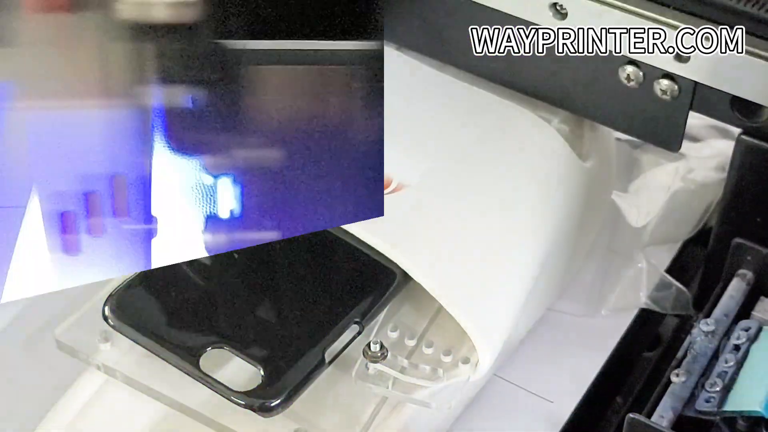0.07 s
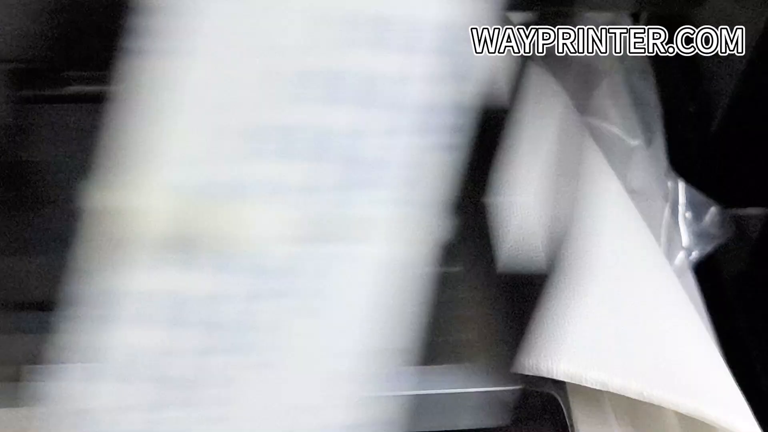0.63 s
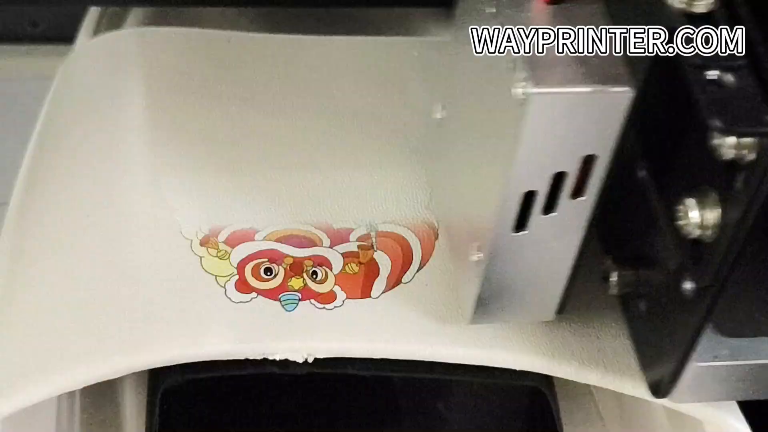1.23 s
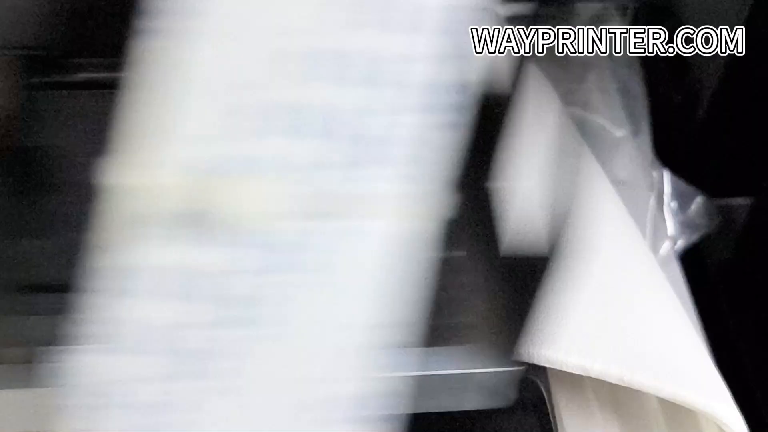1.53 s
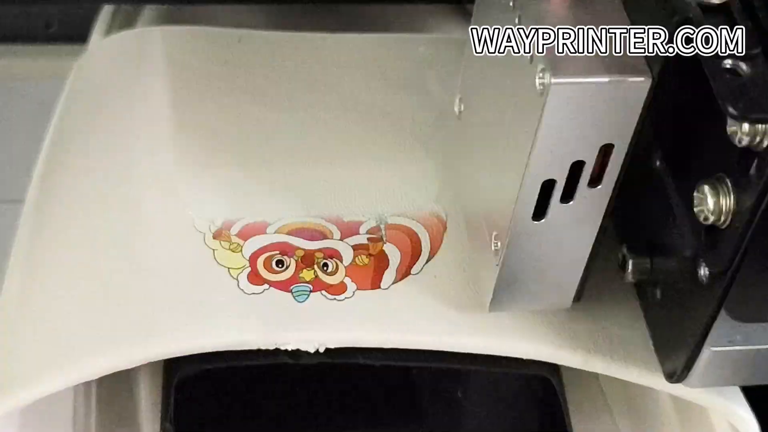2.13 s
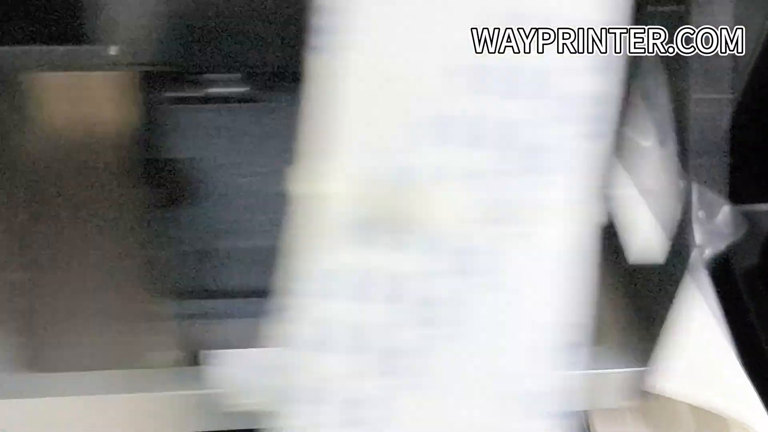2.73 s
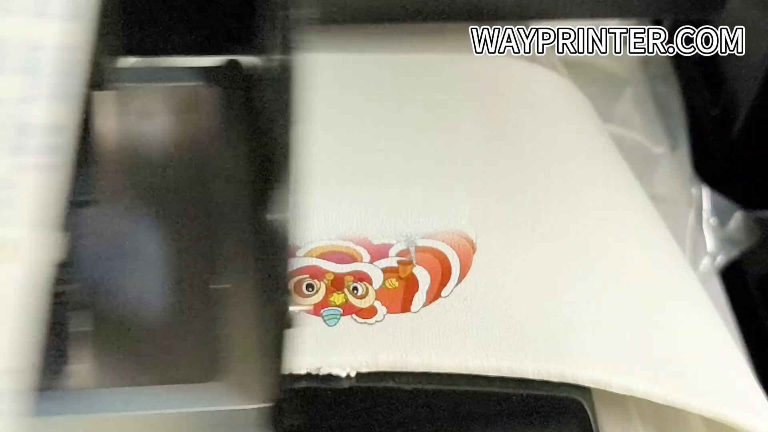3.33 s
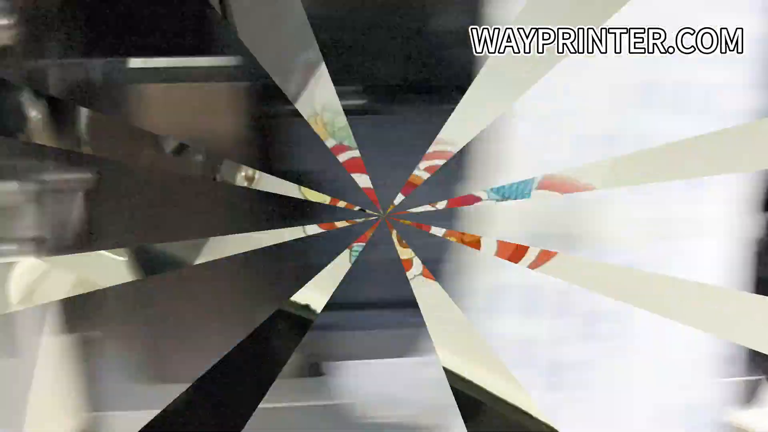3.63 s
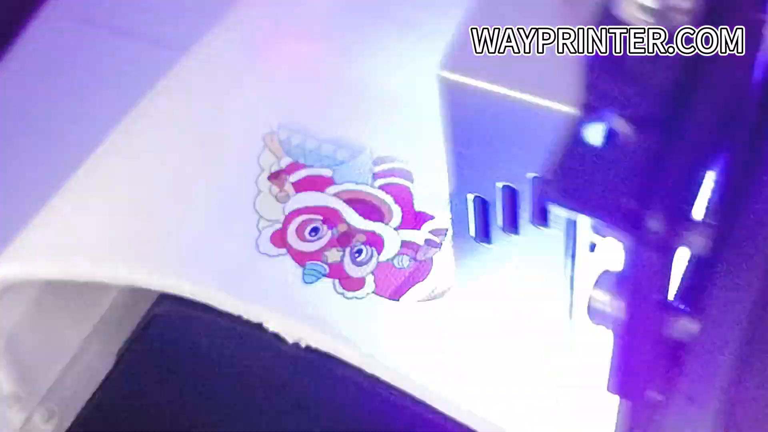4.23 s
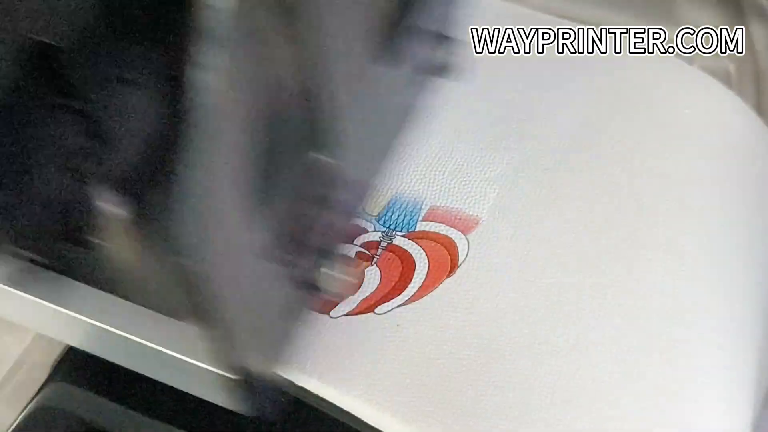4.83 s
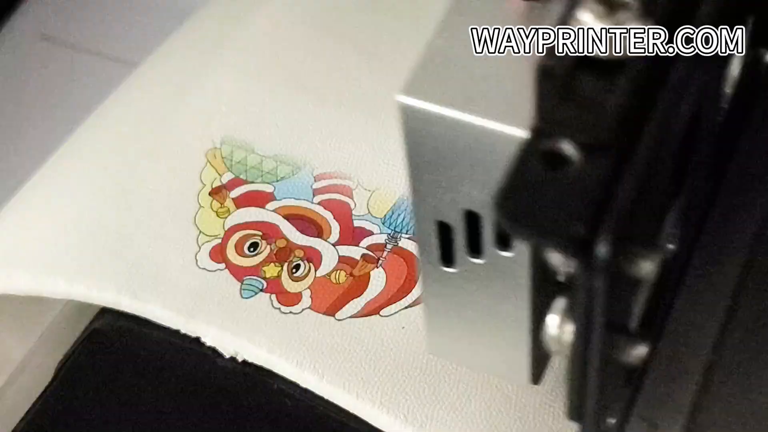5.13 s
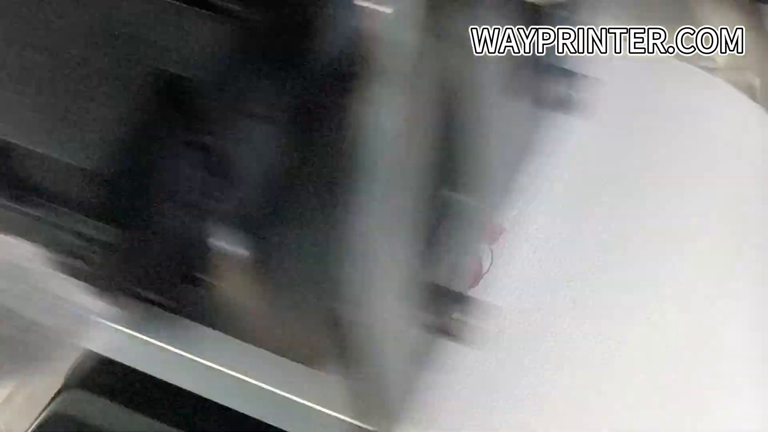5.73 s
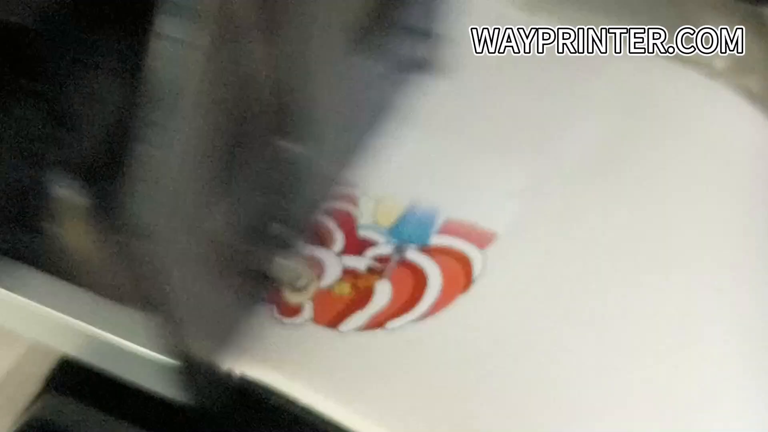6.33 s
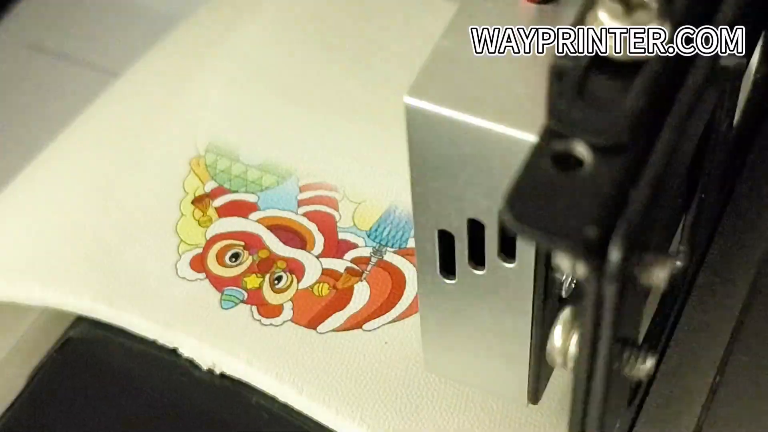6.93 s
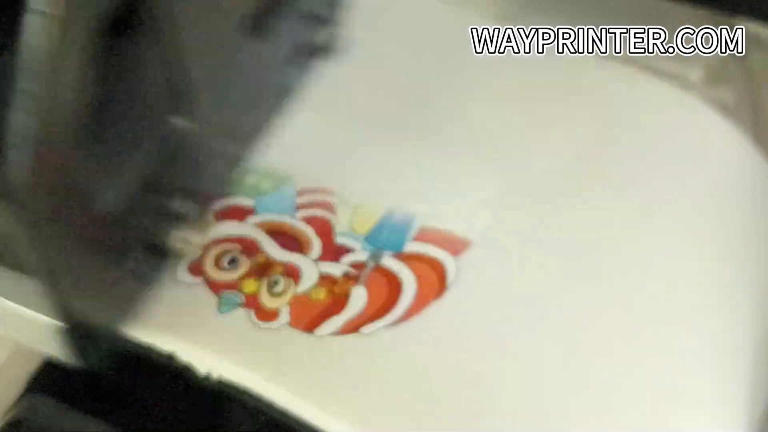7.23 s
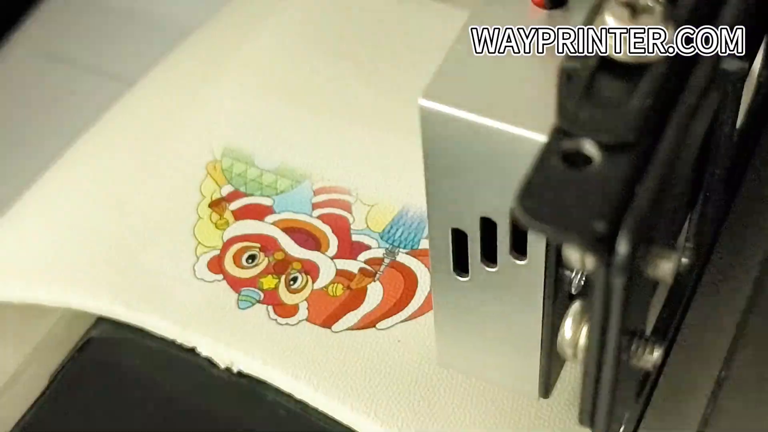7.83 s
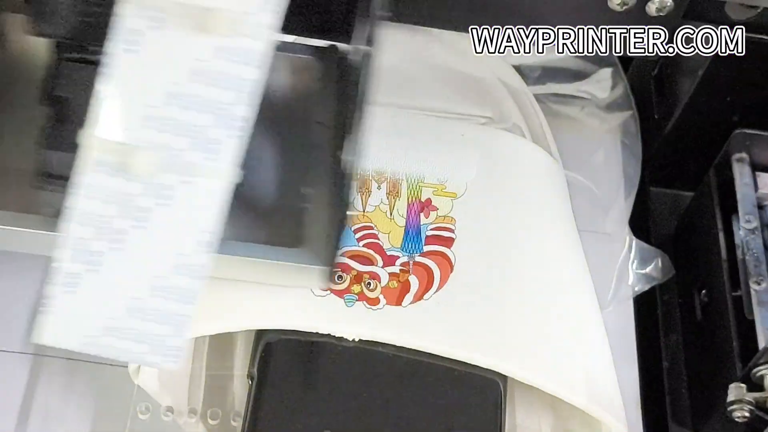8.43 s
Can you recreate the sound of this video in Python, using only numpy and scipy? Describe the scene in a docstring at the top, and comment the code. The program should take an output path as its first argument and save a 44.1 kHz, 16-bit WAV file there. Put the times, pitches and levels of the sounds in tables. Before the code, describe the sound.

Motors and fans hum steadily while a printer's carriage shuttles to and fro, each fast, squeaky swish followed by a slower one. Sharp belt clicks mark the starts, light ticks fall in between, and the frame drones with each stroke. The microphone is close, first in front, then at the side, where a vent hisses and the squeals stand out more, then in front again. Very short silences separate these stretches.

```python
"""A swish dashes past and returns more slowly, over and over, with squeals, ticks and a low drone.
It is a flatbed printer, heard close up from the front or side, in four stretches with silence between.
Ball bearings swish and squeal as the carriage that holds the print head runs along its rail.
The drive belt snaps tight and shakes the frame, a cable chain ticks, and motors and fans hum on."""
import sys
import numpy as np
from scipy import signal
from scipy.fft import rfft, irfft
from scipy.io import wavfile
from scipy.ndimage import uniform_filter1d

SR = 44100
rng = np.random.default_rng(int(sys.argv[2]) if len(sys.argv) > 2 else 0)


def to_wav(s):
    """Save 16-bit WAV."""
    ch = np.atleast_2d(s).T  # columns
    pcm = np.round(np.clip(ch, -1, 1) * 32767)  # PCM
    wavfile.write(sys.argv[1], SR, pcm.astype(np.int16))


N = 373527
CYCLE_S, TURN_S = 0.87, 0.3486  # one round trip; the moment the carriage turns at the far end

# The tone of the swish from the front and from the side:
# (frequency [Hz], fast stroke level [dB], slow stroke level [dB], left minus right [dB])
FRONT_SWISH = [(550.0, -38, -37.5, 0), (1150, -42.5, -42.5, 3), (1940, -37.5, -38, -3),
               (2650, -39, -37.5, 2), (3920, -41.5, -42.5, 1), (5000.0, -41.5, -41.5, 1.5),
               (5900, -44.5, -43, -5), (7300.0, -46, -46.5, -10), (7870, -48, -49.5, -2),
               (8400, -40.5, -42.5, 13), (10060, -45.5, -44, 7.5), (13400, -49, -49, 5),
               (15000.0, -47, -49.5, -0.5)]
SIDE_SWISH = [(550.0, -43.5, -37.5, 0), (1100.0, -40.5, -41, 0.5), (1850, -44, -43.5, 0.5),
              (2610, -36.5, -37.0, 1), (3920, -42, -43, 2), (5040, -42, -41, 1.5),
              (5900, -41.0, -40.0, -6.0), (7230, -41.5, -42, -19.5), (8100, -44, -42.5, -0.5),
              (8440, -41.0, -39.5, 1.5), (9800, -46.0, -45.5, 7), (13000.0, -45, -45.5, -1.5),
              (14900, -46, -47, -8.5)]
# Dry spots on the rail that squeal on the fast stroke: (time into the trip [s], half length [s], level [dB])
DRY_SPOTS = [(0.081, 0.0083, -45.5), (0.132, 0.016, -36), (0.183, .006, -37), (0.21, 0.0099, -35)]
# The carriage leaves home, its starting end, and the belt snaps tight: (time [s], click level [dB])
LAUNCHES = [(0.556, -35), (1.431, -31.5), (2.288, -35), (3.167, -33), (4.444, -29), (5.318, -32),
            (6.194, -35.5), (7.067, -26), (7.947, -30)]


def bearings(trip_s, place, swish_db, grain_db=0.68, flutter_db=0.89, rasp_db=2.0):
    """Rolling balls make the rail ring; they jostle, so the swish is grainy, most of all in the treble."""
    swish = np.zeros((2, N))
    no_bass = 1 / (1 + (480 / (frequencies() + 1)) ** 6)
    for where, (colour, level_db) in enumerate([(FRONT_SWISH, 0), (SIDE_SWISH, 2.1)]):
        for column, stroke in [(1, trip_s < TURN_S), (2, trip_s >= TURN_S)]:
            gain = rail_colour(colour, where, column) * reflections(depth_db=3.5, spacing_hz=59.66) * no_bass
            swish += amp(level_db) * noise(gain, curve(colour, column=3)) * stroke * (place == where)
    treble = irfft(rfft(swish) / (1 + (7000 / (frequencies() + 1)) ** 4), N)
    treble_db = rasp_db * wobble(rate_hz=130) + 0.034 * (swish_db + 28)  # harder running is brighter
    swish += treble * (amp(treble_db) - 1)
    return swish * amp(swish_db + grain_db * wobble(rate_hz=400) + flutter_db * wobble(rate_hz=80))


def carriage_speed(trip_s, ease_s):
    """Each stroke speeds up, cruises and brakes; the drive rounds off every change of speed."""
    # The dash out and the slower return:
    # (start in the trip [s], speeding up [s], cruising [s], braking [s], top speed [share of full speed])
    strokes = [(0, 0.066, 0.13, 0.11, 0.97), (0.381, 0.11, 0.17, 0.12, 0.66)]
    ramps = sum(np.interp(trip_s, np.cumsum(times), [0, top, top, 0]) for *times, top in strokes)
    return np.maximum(uniform_filter1d(ramps, round(ease_s * SR)), 0)


def swish_level(trip_s, speed, place, run_db=-27, rest_db=-55.5, dry_rub_db=1.5):
    """The bearings get louder with speed, and a little more on each dry spot (dB)."""
    dryness = sum(bump(trip_s, at, half) for at, half, _ in DRY_SPOTS)
    steepness = np.where(place, 1, 1.18)  # speed matters less at the side
    rolling = amp(run_db + dry_rub_db * dryness) * speed ** steepness
    return 20 * np.log10(np.hypot(rolling, amp(rest_db)))


def rail_colour(colour, where, column):
    """The tone of one stroke at one listening place, lifted or dipped where the rail rings."""
    # Notes at which rail and carriage ring: (pitch [Hz], width [Hz], front lift [dB], side lift [dB])
    rail_notes = [(743.7, 43, 12, 12.5), (867, 47, -5.5, 8), (1316, 87, 4, 3), (1675, 76, 0.5, 6.5),
                  (1890, 243, 6.5, 12.5), (2430, 160, 1.5, 2), (3010, 55, 1.5, 4), (5860, 200, 5.5, 4),
                  (6590, 220, 3.5, 6), (7370, 230, 4, 9), (8450, 560, 5.5, 4)]
    lift_db = sum(lifts[where] * resonance(hz, width) for hz, width, *lifts in rail_notes)
    return amp(curve(colour, column) + lift_db)


def wall_echo(swish, trip_s, strength=0.23, near_s=0.0032, travel_s=0.00111):
    """The end wall throws the swish back; the delay changes as the carriage travels, so the tone shifts."""
    half_turns = np.interp(trip_s, [0, TURN_S, CYCLE_S], [0, 1, 2])
    position = (1 - np.cos(np.pi * half_turns)) / 2
    delay_s = near_s + travel_s * position
    samples = np.arange(N)
    echo = np.array([np.interp(samples - SR * delay_s, samples, ear) for ear in swish])
    return (swish + strength * echo) / np.sqrt(1 + strength ** 2)


def squeal(trip_s, place, swish_db, squeal_hz=3997, whistle_hz=14075, side_db=4.5):
    """On the fast stroke the bearings sing, flaring on each dry spot; a thin whistle rides along."""
    flares = sum(amp(db) * bump(trip_s, at, half) for at, half, db in DRY_SPOTS)
    singing = amp(-49.5 + 2.1 * (swish_db + 26)) * (trip_s < TURN_S)  # grows faster than the swish
    turns = np.cumsum(squeal_hz + 20 * wobble(rate_hz=56)) / SR
    ear_phase = np.array([[0], [0.8]])
    tone = np.sqrt(2) * np.sin(2 * np.pi * turns + ear_phase) * amp(-3.5 + 4.2 * wobble(rate_hz=80))
    whistle = noise(resonance(whistle_hz, width_hz=200), balance_db=-7) * amp(-16.5)
    squeak = flares * tone + singing * noise(resonance(squeal_hz, width_hz=130))
    return squeak * amp(side_db * place) + (flares + singing) * whistle


def belt_drive(trip_s, place, shake_db):
    """The belt drive makes the frame drone; the flat bed booms most when the carriage is near home."""
    # Notes at which the frame and the bed ring: (pitch [Hz], width [Hz], front level [dB], side level [dB])
    frame_notes = [(134.7, 27.7, -12, -9.5), (292.8, 12.4, -4, -5), (318, 49, -12, -12.5),
                   (359.2, 14.3, 0, -0.5), (395.5, 28.5, -8.5, -4.5), (479, 40, -17.5, -17),
                   (607, 140, -25.5, -26.5)]
    bed_notes = [(179.6, 22, 0, 0), (205, 21.7, 1.5, -1)]
    near_home = np.cos(2 * np.pi * (trip_s - 0.78) / CYCLE_S)
    frame = amp(shake_db - 0.74) * ringing(frame_notes, place)
    bed = amp(shake_db - 9.0 + 5.2 * near_home) * ringing(bed_notes, place)
    return frame + bed


def shake_level(speed, idle_db=-43, run_db=-32, push_db=-40.5, brake_db=-37.5, settle_s=0.018):
    """The frame shakes with speed and with the motor's work in pushing and braking, then settles (dB)."""
    work = speed * np.gradient(speed) * SR
    running = amp(run_db) ** 2 * speed ** 1.86
    pushing = amp(push_db) ** 2 * np.maximum(work, 0)
    braking = amp(brake_db) ** 2 * np.maximum(-work, 0)
    power = running + pushing + braking + amp(idle_db) ** 2
    linger = np.exp(-1 / (settle_s * SR))
    return 10 * np.log10(signal.lfilter([1 - linger], [1, -linger], power))


def ringing(notes, place):
    """Belt teeth and rough running shake a part's own notes, heard in a different blend at each place."""
    blends = []
    for where in range(2):
        power = sum((amp(dbs[where]) * resonance(hz, 1.47 * width)) ** 2 for hz, width, *dbs in notes)
        blends.append(noise(np.sqrt(power), balance_db=1.0))
    front, side = blends
    return front * (1 - place) + amp(2.37) * side * place


def clicks(place, ticks_per_s=6.7, tick_db=-49, spread_db=5, offset_db=-4, decay_s=0.0071):
    """Random ticks of the cable chain, belt snaps and a few loud clicks each make the carriage ring."""
    # Loud extra clicks, two of them just as the carriage sets off: (time [s], level [dB])
    loud_clicks = [(1.8612, -26), (4.884, -25), (5.3343, -24.5), (6.2078, -25), (7.8064, -27)]
    # The slack belt snaps, rebounds, and snaps again on the way back:
    # (time after the launch [s], level added to the launch's [dB])
    belt_snaps = [(0, -0.5), (.035, 2.5), (0.412, -5)]
    blows = amp(tick_db + spread_db * rng.uniform(-0.8, 1, N)) * (rng.random(N) < ticks_per_s / SR)
    snaps = [(at + later_s, db + lift_db) for at, db in LAUNCHES for later_s, lift_db in belt_snaps]
    for at, db in snaps + loud_clicks:
        blows[int(at * SR)] = amp(db + offset_db)
    bursts = signal.lfilter([1], [1, -np.exp(-1 / (decay_s * SR))], blows + 1e-15)
    brighten = 0.31 + resonance(8500, width_hz=4000)
    front, side = (noise(rail_colour(colour, where, column=1) * brighten, curve(colour, column=3))
                   for where, colour in enumerate([FRONT_SWISH, SIDE_SWISH]))
    return bursts * (front * (1 - place) + side * place)


def hum(place):
    """Motors and cooling fans run all the time; at the side a vent hisses too."""
    # The tone of the motors and fans: (frequency [Hz], front level [dB], side level [dB])
    colour = [(48, -25.5, -21), (67, -6.5, -12.5), (88, -17.5, -10.5), (130, 2, 1), (162, -5, -9),
              (205, 4, -1), (265, -4.5, -5.5), (340, -6, -2.5), (513, -14.5, -16.5), (1100, -21.5, -20.5),
              (2600, -23, -25.5), (4200, -28.5, -29), (8400, -35, -35.5), (15000, -45, -36)]
    front = amp(-40) * noise(amp(curve(colour, column=1)) * reflections(depth_db=4.5, spacing_hz=42.4))
    side = amp(-38) * noise(amp(curve(colour, column=2)) * reflections(depth_db=3.0, spacing_hz=45.1))
    vent_colour = resonance(7150, width_hz=2300) * reflections(depth_db=-4.5, spacing_hz=60)
    vent = amp(-49) * noise(vent_colour, balance_db=curve(SIDE_SWISH, column=3) - 1.5)
    return front * (1 - place) + (side + vent) * place


def reflections(depth_db, spacing_hz):
    """Echoes in the hard housing lift some frequencies and dip others, differently for each ear."""
    grid = np.arange(0, SR / 2, spacing_hz)
    ripple = rng.standard_normal((4096, 2))[:len(grid)].T
    return amp(depth_db * np.array([np.interp(frequencies(), grid, ear) for ear in ripple]))


def noise(gain, balance_db=0):
    """Stereo noise of strength one, with its tone shaped by gain; the bass is alike in both ears."""
    # How alike the two ears are: (frequency [Hz], likeness [-1 opposite, 0 unrelated, 1 the same])
    ear_likeness = [(120, 0.99), (280, 0.91), (450, 0.79), (700, 0.25), (900, 0.7), (1350, -0.39),
                    (1900, 0.046), (2500, 0.25), (3400, -0.15), (5000, 0.044)]
    shared, separate, lean = white_spectrum(), white_spectrum(), amp(balance_db)
    alike = np.clip(curve(ear_likeness, column=1), -1, 1)
    ears = np.array([shared * lean, alike * shared + np.sqrt(1 - alike ** 2) * separate])
    return unit_strength(irfft(ears * (gain / np.sqrt(1 + lean ** 2)), N))


def wobble(rate_hz):
    """A smooth random wavering of strength one, mostly slower than the rate."""
    return unit_strength(irfft(white_spectrum() / (1 + (frequencies() / rate_hz) ** 4), N))


def white_spectrum():
    """A random amount of every frequency: plain hiss."""
    return rng.standard_normal(2 * len(frequencies())).view(complex)


def resonance(hz, width_hz):
    """How strongly a part that rings at one pitch answers each frequency."""
    return 1 / (1 + (2 * (frequencies() - hz) / width_hz) ** 2)


def bump(time_s, at_s, half_s):
    """A smooth rise and fall around one moment."""
    return np.exp(-0.5 * ((time_s - at_s) / half_s) ** 2)


def curve(table, column):
    """Joins the points in one column of a table to give a value at every frequency."""
    columns = np.transpose(table)
    return np.interp(np.log(frequencies() + 1), np.log(columns[0] + 1), columns[column])


def frequencies():
    """Every frequency in the spectrum of the whole sound (Hz)."""
    return np.fft.rfftfreq(N, 1 / SR)


def unit_strength(x):
    """Scales a signal to an average strength (rms) of one."""
    return x / np.sqrt(np.mean(x ** 2) + 1e-20)


def amp(db):
    """Turns decibels into a gain to multiply by."""
    return np.exp(np.asarray(db) * (np.log(10) / 20))


def timeline(lead_s, half_fade_s=0.0069):
    """For every sample: time into the round trip, listening place, gain and extra shaking."""
    # Stretches of sound: (start [s], end [s], fade-in [s], place [0 front, 1 side], level [dB],
    # extra shaking [dB], time into the trip at the start [s])
    stretches = [(-.1, 0.196, 0.034, 0, -2, -3.5, 0.063), (.316, 3.812, .04, 0, -.3, .3, .672),
                 (3.938, 8.12, 0.11, 1, -2.5, 1, 0.36), (8.275, 8.66, 0.065, 0, -1, -5, 0.2)]
    t = np.arange(N) / SR
    trip_s, place, gain, extra_shake_db = np.zeros((4, N))
    for start, end, fade_in_s, where, level_db, shaking_db, opens_at_s in stretches:
        trip_s = np.where(t >= start - lead_s, t - start + opens_at_s, trip_s)
        for launch, _ in LAUNCHES:
            if start < launch < end:
                trip_s = np.where(t >= launch, t - launch, trip_s)
        now = (t >= start) & (t < end + half_fade_s)
        place[now], extra_shake_db[now] = round(where), shaking_db
        fade_in = 1 - np.exp(-(t[now] - start) / fade_in_s)
        fade_out = np.interp(t[now], [end - half_fade_s, end + half_fade_s], [1, 0])
        gain[now] = amp(level_db) * fade_in * fade_out
    return trip_s, place, gain, extra_shake_db


def scene(ease_s=0.047):
    """The speed of the carriage sets how loud the bearings and the drive are, over the steady hum."""
    trip_s, place, gain, extra_shake_db = timeline(lead_s=ease_s)
    speed = carriage_speed(trip_s, ease_s)
    swish_db = swish_level(trip_s, speed, place)
    shake_db = shake_level(speed) + extra_shake_db
    swish = wall_echo(bearings(trip_s, place, swish_db), trip_s)
    carriage = swish + squeal(trip_s, place, swish_db) + clicks(place)
    return gain * (carriage + belt_drive(trip_s, place, shake_db) + hum(place))


def record(dry, low_cut_hz=55, high_cut_hz=15850):
    """A small microphone loses the deep bass; the highest treble is cut off too."""
    thin = signal.sosfilt(signal.butter(2, low_cut_hz, "high", fs=SR, output="sos"), dry)
    treble_cut = signal.firwin(801, high_cut_hz, window=("kaiser", 9), fs=SR)
    return signal.oaconvolve(thin, treble_cut[None], "same", axes=1)


dry = scene()
out = record(dry)
to_wav(out)
```